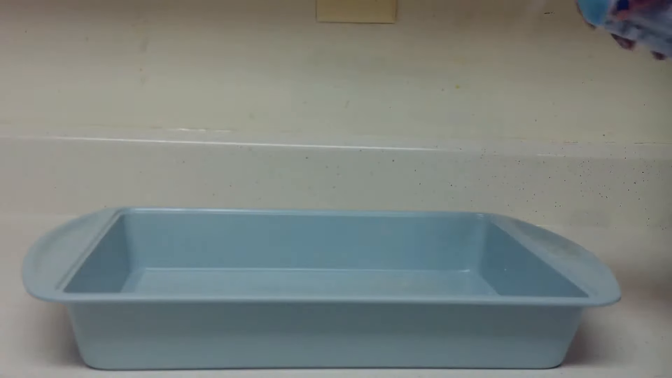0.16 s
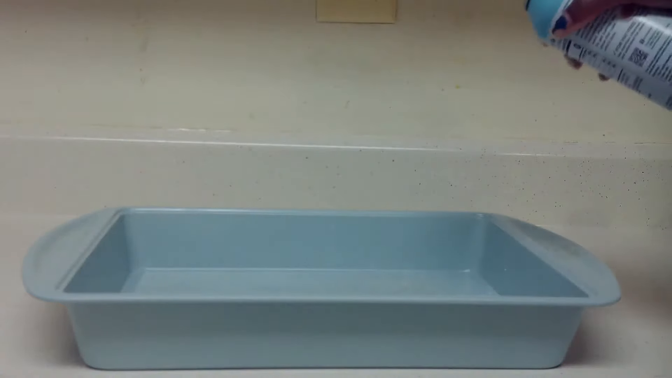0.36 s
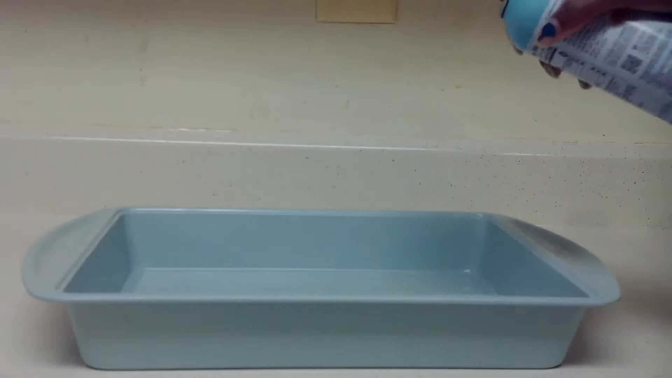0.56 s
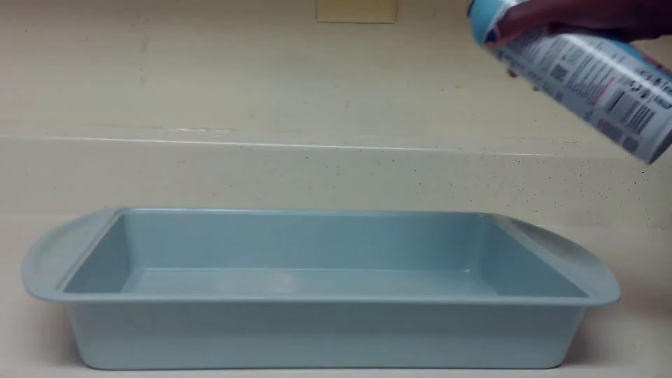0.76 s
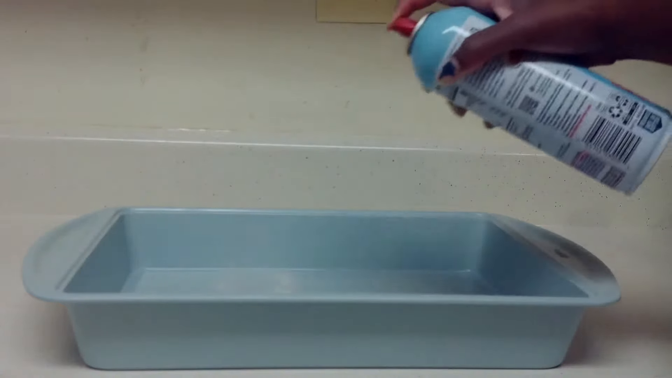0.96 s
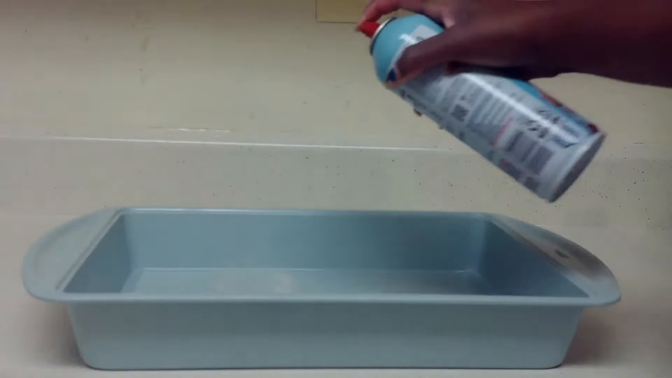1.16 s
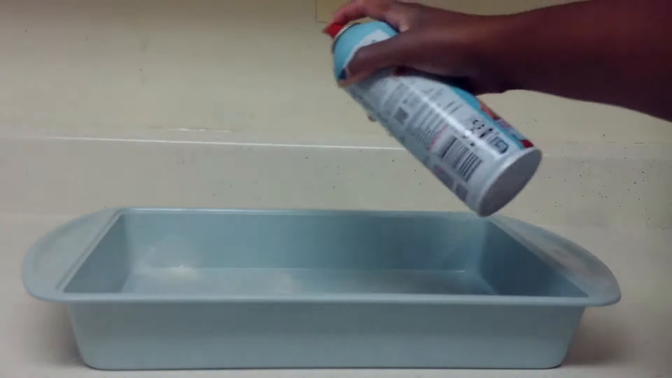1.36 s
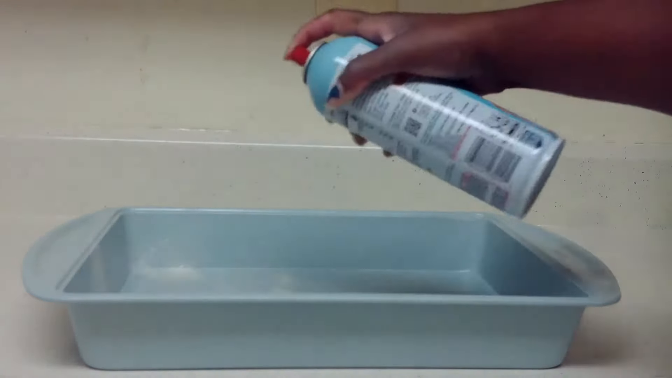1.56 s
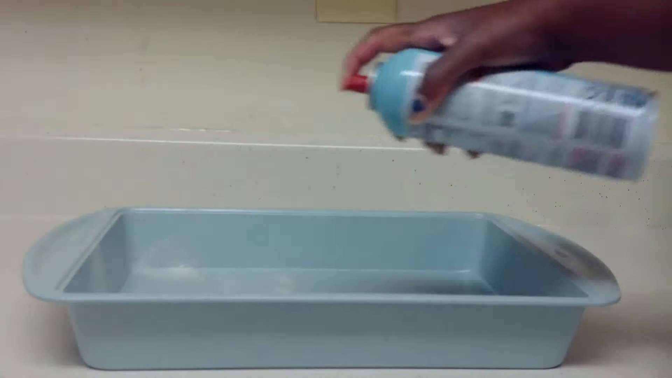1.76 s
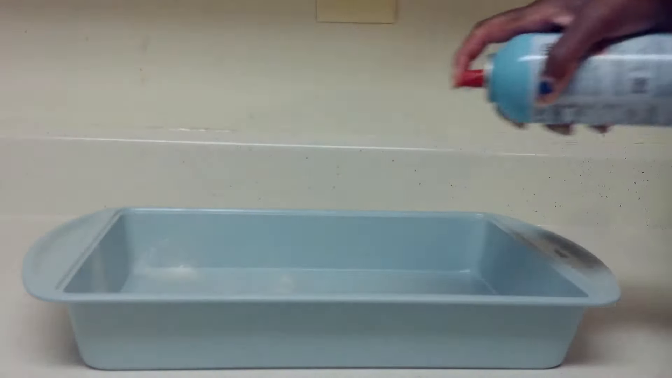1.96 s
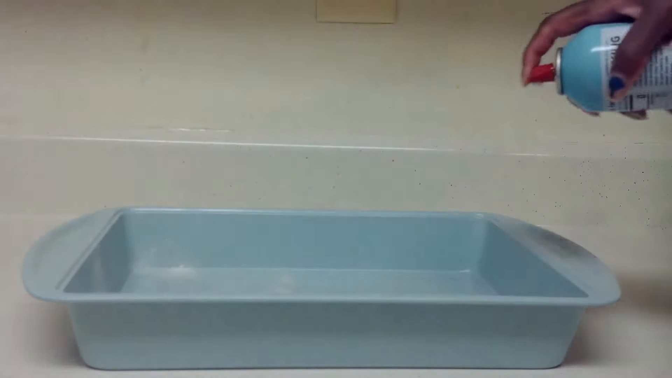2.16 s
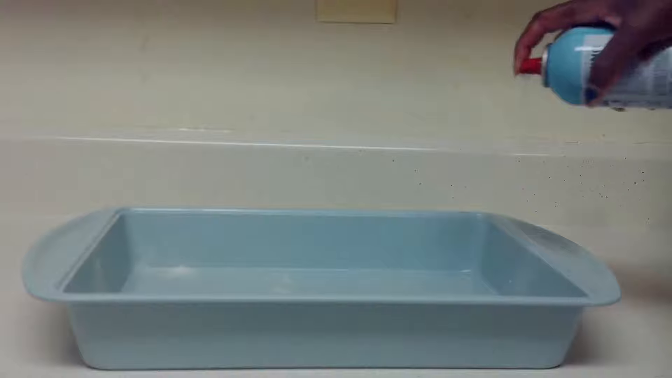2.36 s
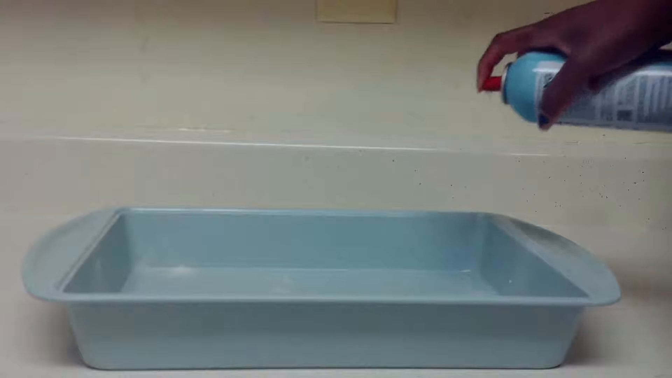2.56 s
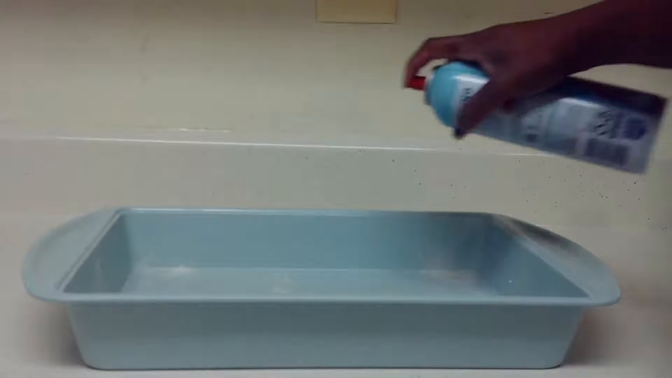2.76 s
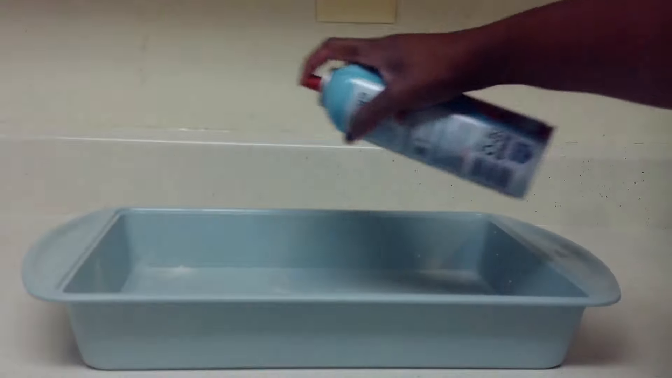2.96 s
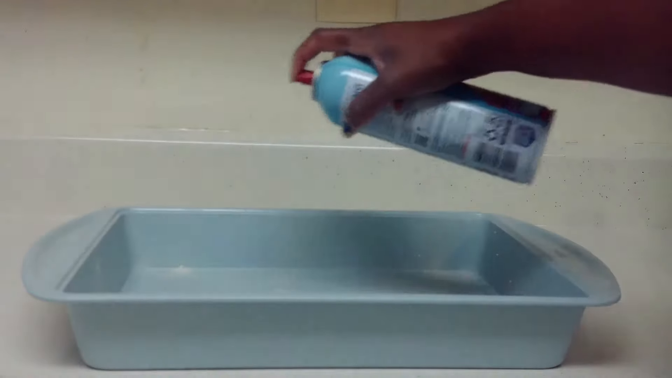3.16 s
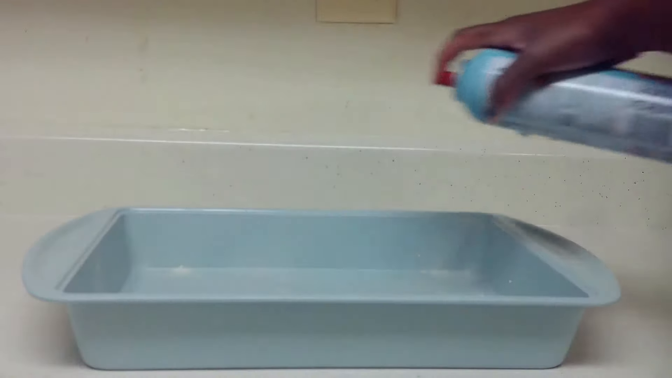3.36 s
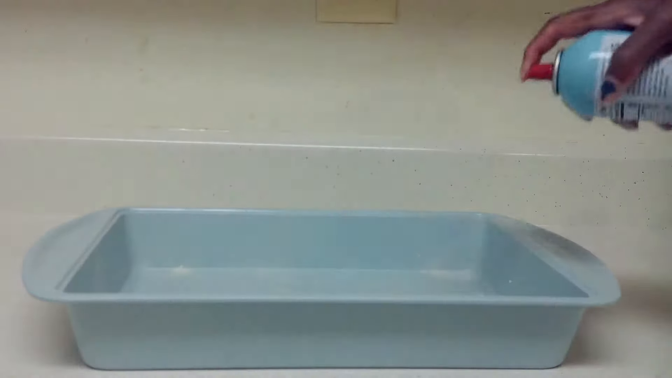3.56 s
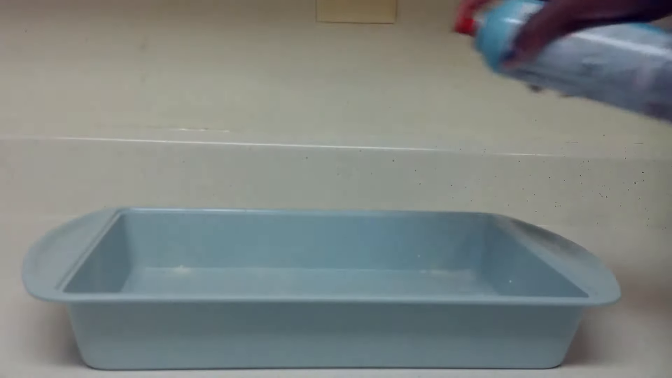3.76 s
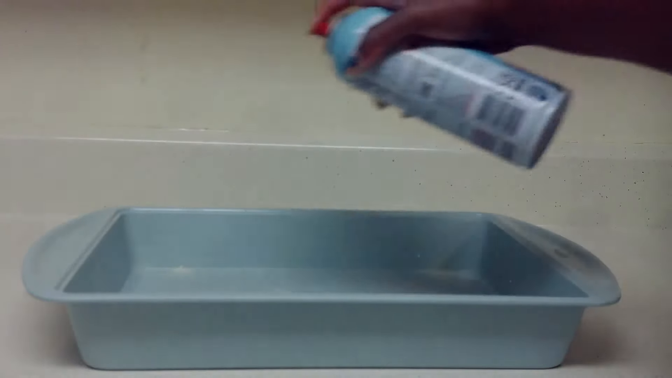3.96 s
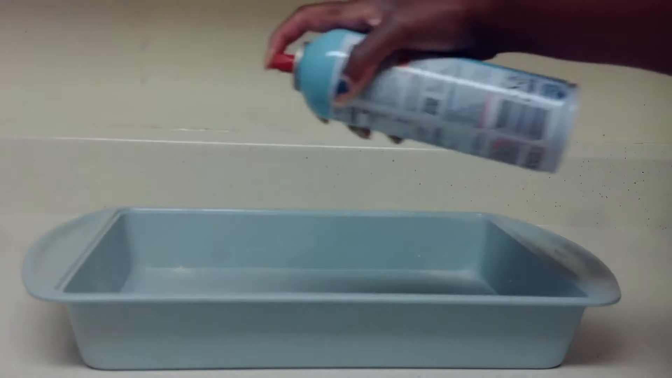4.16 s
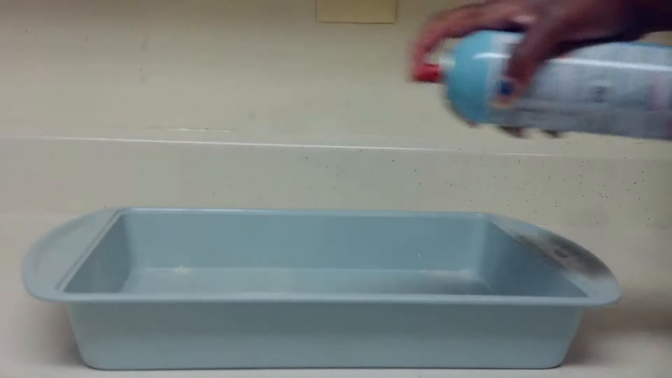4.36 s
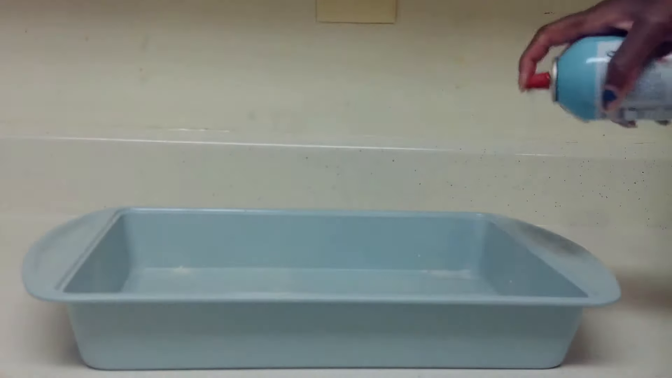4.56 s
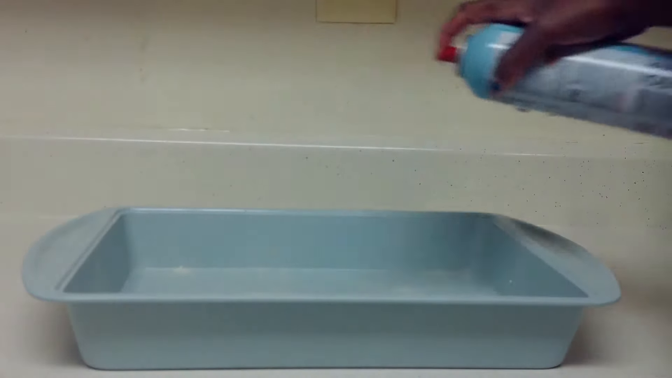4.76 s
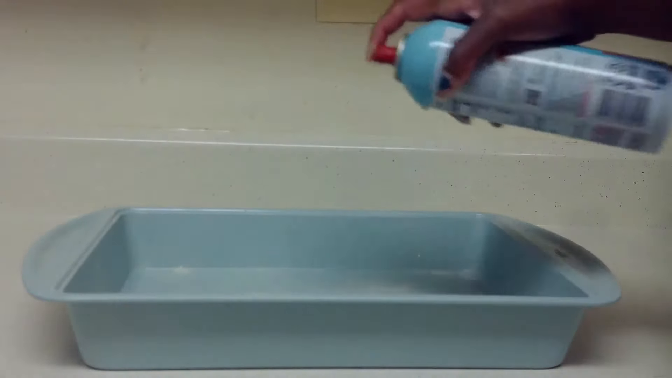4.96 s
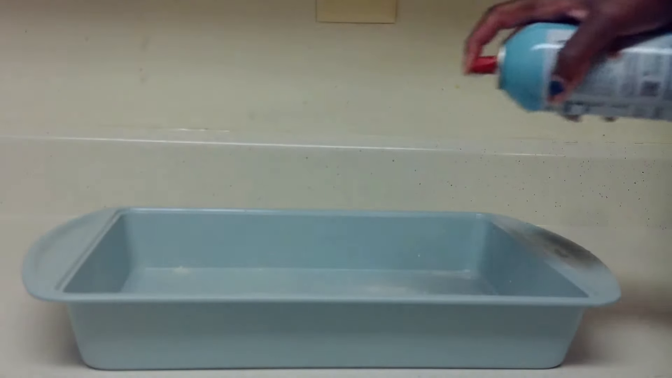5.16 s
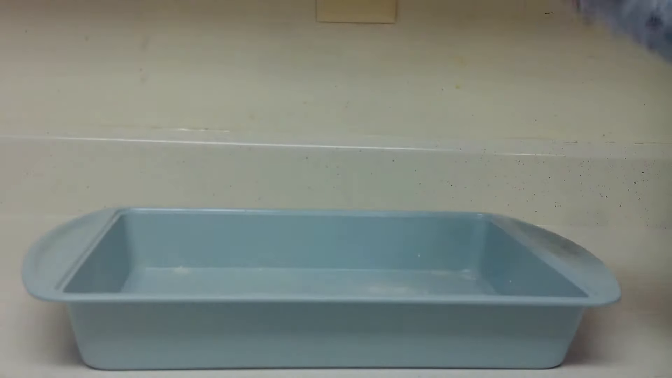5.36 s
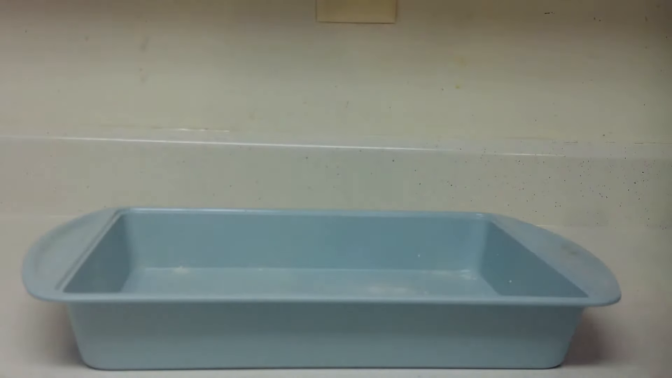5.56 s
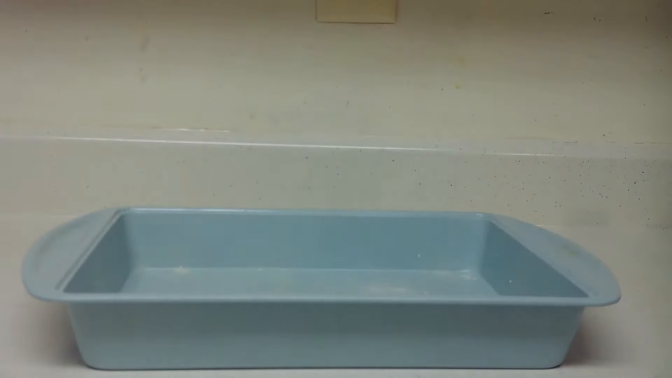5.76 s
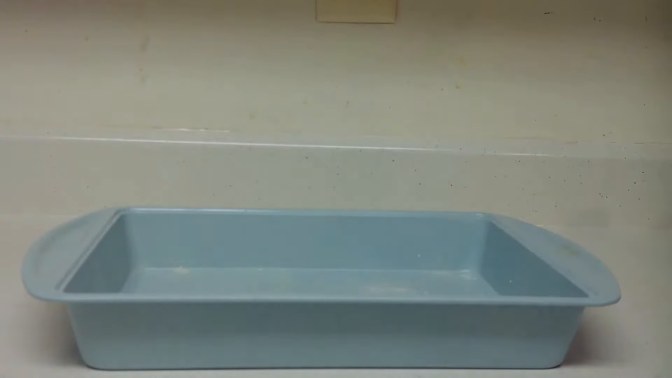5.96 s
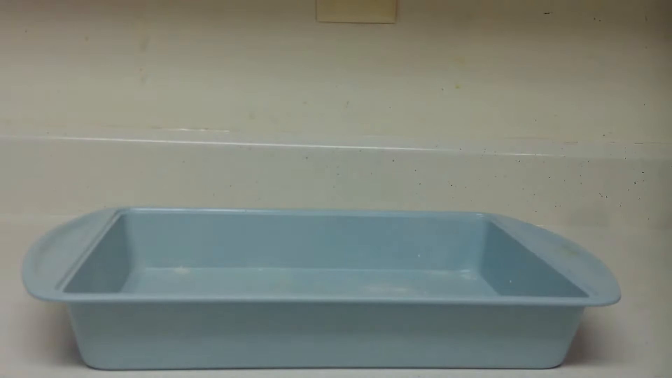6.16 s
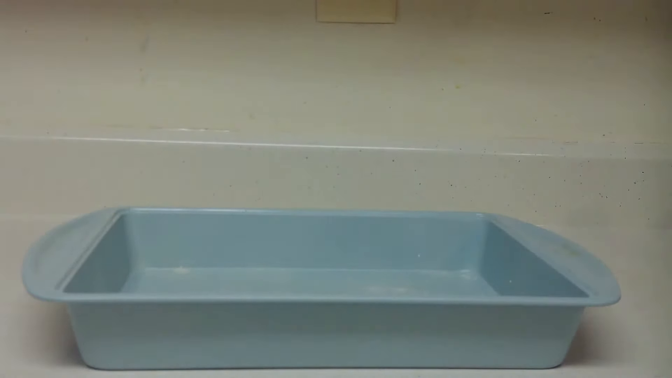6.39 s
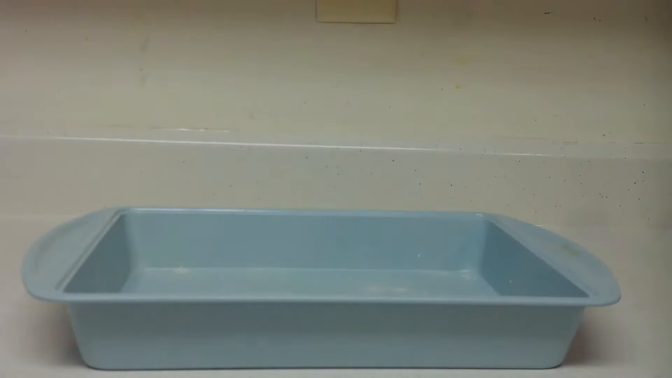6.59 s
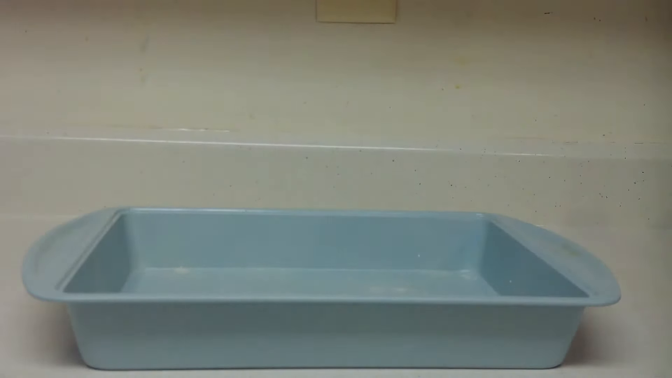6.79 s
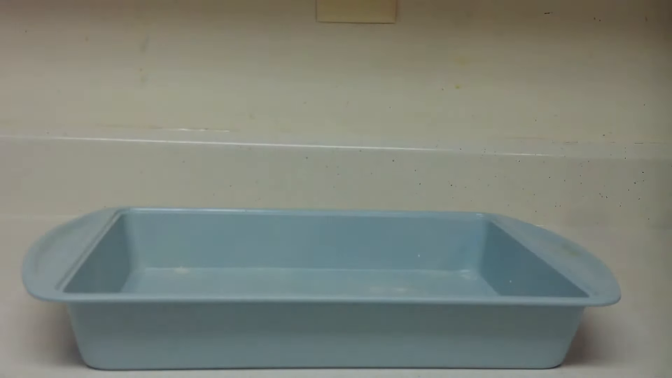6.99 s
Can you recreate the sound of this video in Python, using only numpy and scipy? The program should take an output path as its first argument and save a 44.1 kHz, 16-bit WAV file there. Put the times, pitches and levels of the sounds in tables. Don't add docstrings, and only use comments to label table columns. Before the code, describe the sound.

Close in a small, hard kitchen, a cooking spray can is pulsed about four times a second. Each puff begins with a tiny high tick and hisses brightly for a tenth of a second, with faint oil patter in the pan. After twenty puffs, a sleeve rustles, the plastic cap clicks loudly and rings lightly, the hollow can bumps, and it rattles down onto the counter.

```python
import sys
import numpy as np
from scipy import signal
from scipy.fft import next_fast_len
from scipy.io import wavfile
from scipy.ndimage import uniform_filter1d

SR = 44100
rng = np.random.default_rng(int(sys.argv[2]) if len(sys.argv) > 2 else 0)


def generate_wav(signal):
    frames = np.transpose(np.atleast_2d(signal))
    scaled = np.clip(frames, -1, 1) * 32767
    pcm = np.round(scaled).astype(np.int16)
    wavfile.write(sys.argv[1], SR, pcm)


def field_ratio(decibels):
    return 10 ** (np.asarray(decibels, dtype=float) / 20)


N = 310023


def evened(x):
    return x / np.sqrt(np.mean(x ** 2) + 1e-20)


def smooth(x, bin_span, frame_span):
    return uniform_filter1d(uniform_filter1d(x, size=bin_span, axis=0), size=frame_span, axis=1)


def read(points, hz):
    f, value = np.transpose(points)
    return np.interp(np.log(hz + 1), np.log(f + 1), value)


def band(x, low_hz, high_hz, edge_hz=150):
    hz = np.fft.fftfreq(next_fast_len(N), 1 / SR)
    above = np.clip((hz - low_hz) / edge_hz + .5, 0, 1)
    below = np.clip((high_hz - hz) / edge_hz + .5, 0, 1)
    return np.fft.ifft(2 * above * below * np.fft.fft(x, len(hz)))[:N]


def noise(spectrum, patchy_db, streaky_db=0.0, size=512):
    hop = size // 4
    a, b, patches, streaks = rng.standard_normal((N // hop + 5, size // 2 + 1, 4)).T
    patches = evened(smooth(patches, 5, 14))
    streaks = evened(smooth(streaks, 2, 30))
    colour_db = read(spectrum, np.fft.rfftfreq(size, 1 / SR))[:, None]
    db = colour_db + patchy_db * patches + streaky_db * streaks
    return evened(signal.istft((a + 1j * b) * field_ratio(db), nperseg=size, noverlap=size - hop)[1][:N])


def flutter(db, size):
    drift = uniform_filter1d(uniform_filter1d(rng.standard_normal(N), size), size)
    return evened(field_ratio(db * evened(drift)))


def ring(hz, db, t60):
    t = np.arange(6000) / SR
    return field_ratio(db - 60 * t / max(t60, .003)) * np.sin(2 * np.pi * hz * t)


def add(mix, s, sound):
    part = mix[round(s * SR):][:len(sound)]
    part += sound[:len(part)]


# frequency in Hz, level in dB per Hz.
HUSH_COLOUR = [(12, -12), (20, -3), (33, -13.5), (58, -34), (93, -11.5), (129, -14), (202, -15), (299, -14),
               (652, -17), (936, -21), (14000, -39), (15600, -44.5)]


def hush():
    return field_ratio(-62.5) * noise(HUSH_COLOUR, patchy_db=0.0, size=2048)


# frequency in Hz, t60 in seconds.
KITCHEN_DECAY = [(300, 0.44), (900, 0.35), (2500, 0.3), (6000, 0.29), (14000, 0.17)]


def kitchen(x):
    taps = np.zeros((3, SR // 2))
    slots = np.arange(130, SR // 2 - 10, 10)
    at = slots + rng.integers(0, 10, (3, len(slots)))
    np.put_along_axis(taps, at, rng.choice([-1., 1.], at.shape), axis=1)
    hz, t, z = signal.stft(taps, SR, nperseg=256)
    decay = field_ratio(-60 * t / read(KITCHEN_DECAY, hz)[:, None])
    tails = signal.istft(z * decay, SR, nperseg=256)[1]
    cycles = 4.3 * np.arange(N) / SR + np.arange(3)[:, None] / 3
    turns = np.cos(2 * np.pi * cycles) * np.sqrt(2 / 3)
    return signal.fftconvolve(x * turns, tails / np.linalg.norm(tails[0]), axes=1)[:, :N].sum(0)


# loudest moment in seconds, dry rustle in dB,
# dull rub in dB re rustle, rise in dB/s, fade in dB/s.
STROKES = [(5.67, -64, -18.5, 901, 32), (5.766, -58.5, -14, 97, 168), (5.944, -63, -7, 67, 204.5),
           (6.06, -64, -6, 31, 34), (6.12, -55, 7, 260, 150), (6.322, -53, -5, 1500, 144),
           (6.4, -63, 1.5, 40, 32.5), (6.507, -58, -5, 1497, 112), (6.648, -52.5, 4, 401, 172.5),
           (6.947, -54.5, 5.5, 3001.5, 220), (6.989, -58.5, 10, 588, 97)]
# frequency in Hz, level in dB per Hz.
CLOTH_COLOUR = [(350, -56), (600, -27), (777, -7), (928, -1.5), (2410, -8), (2510, -10.5), (3170, -6),
                (3990, -9), (10100, -6), (15600, -11)]


def rustle():
    t = np.arange(N) / SR
    cloth = noise(CLOTH_COLOUR, patchy_db=-1.8) * flutter(1.9, size=50)
    dry, dull = np.zeros((2, N))
    for s, dry_db, dull_db, rise_db, fade_db in STROKES:
        rise, fade = rise_db * (s - t), fade_db * (t - s)
        dry = np.hypot(dry, field_ratio(dry_db - np.maximum(rise, fade)))
        dull = np.hypot(dull, field_ratio(dry_db + dull_db - np.maximum(6 * rise, 1.28 * fade)))
    crisp = evened(band(cloth, 3670, 13800, 1750).real)
    soft = evened(band(cloth, 700, 3560, 1600).real)
    return dry * crisp + dull * soft


def blows(rows, rattle_db, rattle_s, partner):
    out, t = np.zeros(N), np.arange(4000) / SR
    for s, db, hz, bright_hz, bright_db, t60 in rows:
        rattle = rng.standard_normal(4000) * field_ratio(rattle_db - 60 * t / rattle_s) + (t == 0)
        contact = ring(hz, -31.5, 4.8 / hz)[:400]
        pair = ring(hz, db, t60) + ring(partner * hz, db - 6, 0.8 * t60)
        body = signal.fftconvolve(contact, pair)[:6000]
        bright = ring(bright_hz, db + bright_db, 0.74 * t60)
        bright += ring(min(1.4 * bright_hz, 11000), db + bright_db, .002)
        add(out, s, signal.fftconvolve(rattle, body + bright))
    return out


def struck(rows, bright_hz, bright_db, t60):
    return [(s, db, hz, bright_hz, bright_db, t60) for s, db, hz in rows]


# start in seconds, blow in dB, body in Hz, bright mode in Hz,
# bright level in dB re blow.
CAP_SNAPS = [
    (5.756, -48.5, 1230, 8900, 4),
    (5.786, -53, 900, 9000, 4),
    (5.848, -52, 950, 6270, -5),
    (5.93, -54.5, 1220, 8600, -5),
    (6.093, -53.5, 1080, 5550, -3),
    (6.116, -30.5, 1400, 2700, -9.5),
    (6.204, -33.5, 1090, 2870, -24),
    (6.321, -53.5, 1780, 2400, 4),
]


def cap_snaps():
    return blows([(*row, 0.0082) for row in CAP_SNAPS], -16.5, 0.044, 1.7)


# start in seconds, blow in dB, body in Hz.
CAP_TOUCHES = [
    (6.506, -46, 1610),
    (6.539, -49, 1640),
    (6.562, -53, 1630),
]


def cap_ring():
    return blows(struck(CAP_TOUCHES, bright_hz=4560, bright_db=-12, t60=.17), -21.0, 0.028, 0.95)


# start in seconds, blow in dB, body in Hz.
CAN_THUDS = [
    (6.645, -32.5, 637),
    (6.651, -34.5, 610),
    (6.671, -36.5, 668),
    (6.699, -47, 650),
]


def can_thuds():
    return blows(struck(CAN_THUDS, bright_hz=1530, bright_db=-9, t60=0.027), -23, 0.06, 1.13)


# start in seconds, blow in dB, body in Hz.
COUNTER_KNOCKS = [
    (6.945, -21.5, 1400),
    (6.959, -25, 1416),
    (6.977, -31.5, 1450),
    (6.986, -21.5, 1450),
    (6.999, -21, 1370),
    (7.006, -25, 1480),
    (7.021, -25, 1360),
]


def counter_knocks():
    return blows(struck(COUNTER_KNOCKS, bright_hz=3500, bright_db=-32, t60=0.021), -22, .04, 0.42)


# start in seconds, level in dB, pitch in Hz.
VALVE_TICKS = [(0.175, -26, 7700), (0.4033, -24, 7840), (0.6545, -45, 7560), (0.9012, -27, 8450),
               (1.2054, -34, 7860), (1.51, -28, 8500), (1.797, -22, 8500), (2.0686, -22.5, 6600),
               (2.3455, -23, 8000), (2.6065, -21.5, 7100), (2.881, -20, 8170), (3.1609, -22.5, 8000),
               (3.4248, -16, 8220), (3.6948, -26, 8400), (3.9492, -16, 8700), (4.2235, -19.5, 8070),
               (4.479, -18.5, 7600), (4.7483, -17, 7900), (5.027, -23, 8500)]
# pitch factor, level in dB, t60 in seconds.
VALVE_MODES = [
    (0.99, -7, 0.018),
    (.82, -11, 0.019),
    (0.65, -16.5, .013),
    (.45, -17.5, .011),
]


def valve_ticks():
    ticks = np.zeros(N)
    onset = np.sin(np.pi / 2 * np.minimum(np.arange(6000) / 45, 1)) ** 2
    for s, tick_db, tick_hz in VALVE_TICKS:
        modes = [ring(factor * tick_hz, tick_db + db, t60) for factor, db, t60 in VALVE_MODES]
        add(ticks, s, sum(modes) * onset)
    return ticks


def press_flow(t, pressed_s, open_s, go_s):
    leak_db, rush_db_per_s = np.array([[-9], [-12], [-10]]), np.array([[600], [800], [1100]])
    swell_db, swell_s = np.array([[-6], [-5], [-3.5]]), np.array([[.025], [.022], [.012]])
    early_s, shut_db_per_s = np.array([[.02], [.021], [.016]]), np.array([[500], [600], [750]])
    bleed_db, bleed_db_per_s = np.array([[-18], [-21], [-25]]), np.array([[220], [280], [400]])
    slow_db = 297.5 * (open_s - pressed_s)
    rush = np.maximum(rush_db_per_s * np.minimum(t - open_s, 0), leak_db - slow_db)
    swell = swell_db * np.exp(-np.maximum(t - open_s, 0) / swell_s)
    after = np.maximum(t - go_s + early_s, 0)
    shut = field_ratio(-shut_db_per_s * after) + field_ratio(bleed_db - bleed_db_per_s * after)
    fade_in = np.clip((t - pressed_s + (open_s < 0)) / 0.0038, 0, 1)
    return field_ratio(rush + swell) * shut * fade_in


# valve open in seconds, let go in seconds, gas flow in dB,
# nozzle whistle in dB re flow, patter in the pan in dB re flow.
PRESSES = [(-.06, 0.038, -26, 6, -19), (0.191, 0.279, -23.5, 7, -12.5), (0.415, 0.537, -24.5, 9, -16),
           (.666, 0.768, -23.5, 6.5, -17.5), (0.921, 1.043, -23.5, 8.5, -16.5),
           (1.224, 1.324, -25, 8, -16.5), (1.532, 1.634, -25.5, 7.5, -15.5), (1.822, 1.923, -25, 10, -16.5),
           (2.086, 2.181, -24.5, 9, -16.5), (2.361, 2.468, -29, 11, -14.5), (2.626, 2.732, -25.5, 9.5, -15),
           (2.903, 3.003, -25, 8, -12.5), (3.2, 3.291, -21.5, 7.5, -13.5), (3.452, 3.556, -23, 7.5, -14),
           (3.71, 3.809, -24, 7.5, -14), (3.967, 4.078, -28, 10.5, -15), (4.24, 4.373, -27, 10.5, -15),
           (4.488, 4.62, -25, 9, -17), (4.765, 4.886, -24.5, 8.5, -15), (5.051, 5.205, -27, 9.5, -16)]
# frequency in Hz, level in dB per Hz.
JET_COLOUR = [(150, -71), (250, -35.5), (353, -33.5), (1250, -25.5), (1860, -20.5), (2250, -21.5),
              (2720, -16), (3980, -17), (5070, -15), (5530, -18), (5930, -16), (10700, -3), (13100, -5.5),
              (15600, -23)]


def spray():
    pan_top_hz, whistle_foot_hz = 2950, 8900
    jet = noise(JET_COLOUR, patchy_db=2.5, streaky_db=1.5)
    patter = evened(band(jet, 0, pan_top_hz).real) * flutter(0.72, size=90)
    roar = evened(band(jet, pan_top_hz, whistle_foot_hz).real)
    whistle = evened(band(jet, whistle_foot_hz, SR / 2).real)
    levels = np.zeros((3, N))
    pressed = [0] + [row[0] for row in VALVE_TICKS]
    for (open_s, go_s, flow_db, whistle_db, patter_db), pressed_s in zip(PRESSES, pressed):
        t = pressed_s + np.arange(SR // 2) / SR
        flow = field_ratio(flow_db) * press_flow(t, pressed_s, open_s, go_s)
        for layer, level, db in zip(levels, flow, (patter_db, 0, whistle_db)):
            add(layer, pressed_s, field_ratio(db) * level)
    return (levels * [patter, roar, whistle]).sum(0) * flutter(0.35, size=40)


def scene():
    can = spray() + valve_ticks()
    hits = cap_snaps() + cap_ring() + can_thuds() + counter_knocks()
    damped = field_ratio(-15) * hits
    wet = kitchen(field_ratio(-7.0) * can + damped)
    mono = field_ratio(-1.5) * can + hits + wet + rustle() + hush()
    return np.array([mono, mono])


TREBLE_HZ, BLOCK = 8750, 1024


def drop_treble(x):
    frame_s, first_s, lost_s, late_s = .032, .023, .028, .005
    t, kept = np.arange(N) / SR, np.ones(N)
    for s in [row[0] for row in VALVE_TICKS + COUNTER_KNOCKS[:1]]:
        frames = np.floor((np.array([s, s + late_s]) - first_s) / frame_s)
        start, last = first_s + frame_s * frames
        kept = np.where((t > start) & (t < last + lost_s), field_ratio(-38.5), kept)
    return x - (1 - uniform_filter1d(kept, size=100)) * band(x, TREBLE_HZ, SR / 2).real


# frequency in Hz, level in dB.
FAINT_TREBLE = [(11500, -114), (13000, -107), (15300, -106), (15750, -86)]
# centre in seconds, length in seconds, top in Hz.
STARVED_BASS = [(.025, .03, 220), (.24, .04, 200), (.55, .04, 160), (.69, .02, 140), (.78, .03, 240),
                (1.03, .03, 60), (1.61, .05, 220), (1.9, .06, 120), (2.13, .04, 50), (3.24, .035, 70),
                (3.5, .035, 250), (3.8, .02, 130), (4.28, .02, 130), (4.57, .035, 300), (4.81, .04, 280),
                (5.17, .035, 300)]


def thin_out(hz, t, z):
    power = smooth(abs(z) ** 2, 2, 5)
    z = z * (power > field_ratio(2 * read(FAINT_TREBLE, hz))[:, None]) * (hz < 15770)[:, None]
    for s, length, top_hz in STARVED_BASS:
        starved = (abs(t - s) < length / 2 + .008) & (hz < top_hz)[:, None]
        z = z * np.where(starved, field_ratio(-30), 1)
    return z


# start in seconds, end in seconds, share slipping.
PHASE_SLIPS = [(.199, .275, .7), (.408, .53, .9), (1.918, 1.965, .6), (2.103, 2.175, .5), (2.916, 2.96, .8),
               (3.45, 3.522, .9), (4.774, 4.845, .7), (5.052, 5.197, .5)]
# start in seconds, low edge in Hz, high edge in Hz.
BAND_GLITCHES = [(2.64, 12300, 14000), (2.64, 5200, 6300), (3.755, 7000, 8300), (4.545, 4200, 5800),
                 (4.545, 14500, 15700)]


def phase_slips(hz, t):
    tiles = rng.random((len(t) // 8 + 1, len(hz) // 16 + 1)).T
    luck = np.kron(tiles, np.ones((16, 8)))[:len(hz), :len(t)]
    turn = np.zeros((len(hz), len(t)))
    loudness = np.exp(-((hz - 10800) / 2600) ** 2)[:, None]
    for start, end, share in PHASE_SLIPS:
        slip = np.clip(5 * (.85 * share * loudness + luck - 1), 0, 1)
        inside = (t > start) & (t < end - .006) & (hz > TREBLE_HZ)[:, None]
        reversed_end = (t > end - .022) & (end - start > .06)
        turn += inside * np.pi * np.where(reversed_end, 1, slip)
    for s, low_hz, high_hz in BAND_GLITCHES:
        turn += .9 * ((t > s) & (t < s + BLOCK / SR) & ((hz > low_hz) & (hz < high_hz))[:, None])
    return turn


def roll_off(x):
    return signal.sosfilt(signal.butter(12, 15770, fs=SR, output="sos"), x)


def record(dry):
    overlap = BLOCK * 3 // 4
    hz, t, z = signal.stft(drop_treble(dry[0]), SR, nperseg=BLOCK, noverlap=overlap)
    left = thin_out(hz, t, z)
    right = left * np.exp(1j * phase_slips(hz, t))
    mix = signal.istft(np.array([left, right]), nperseg=BLOCK, noverlap=overlap)[1][:, :N]
    return roll_off(mix)


dry = scene()
out = record(dry)
generate_wav(out)
```